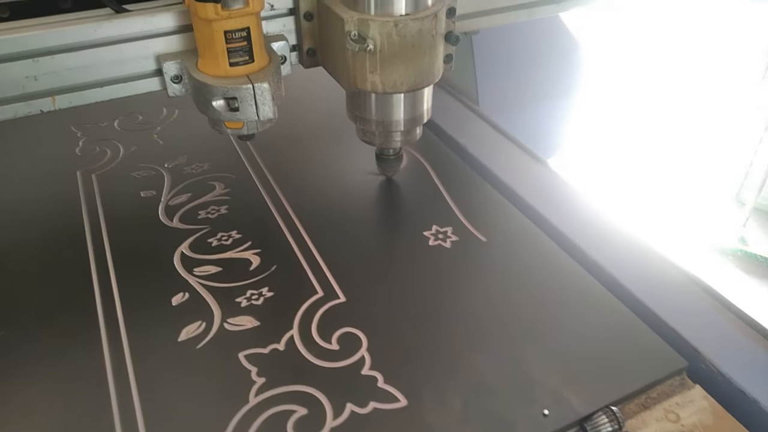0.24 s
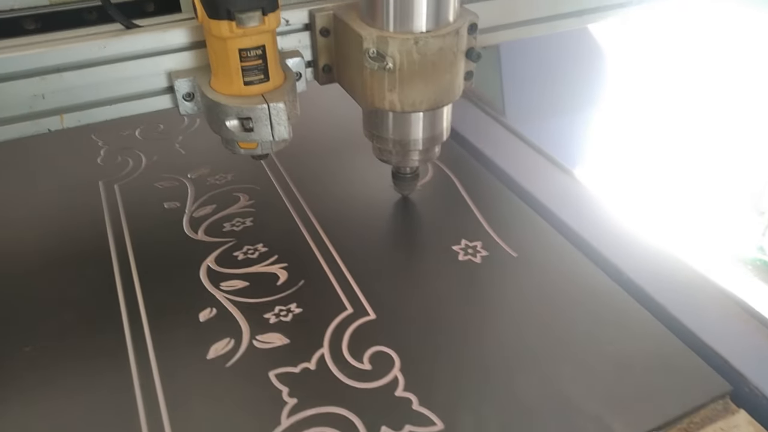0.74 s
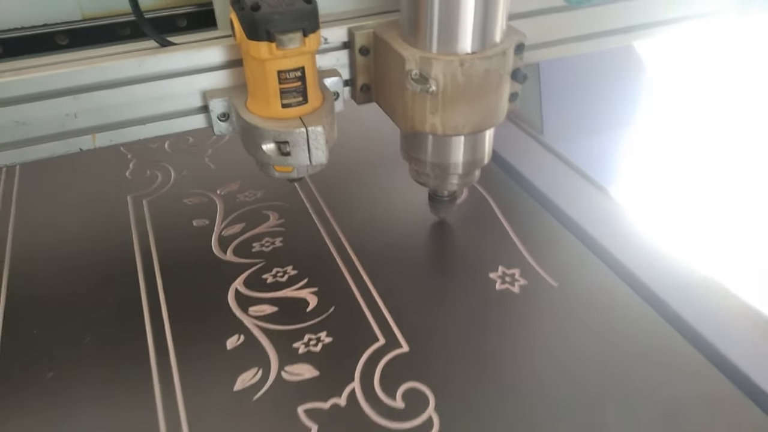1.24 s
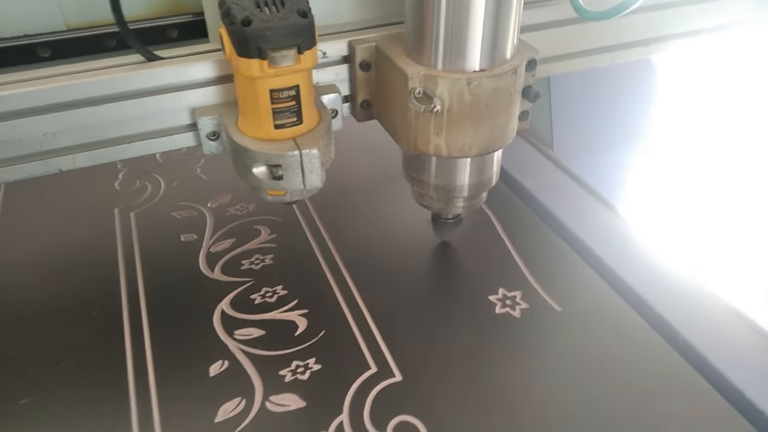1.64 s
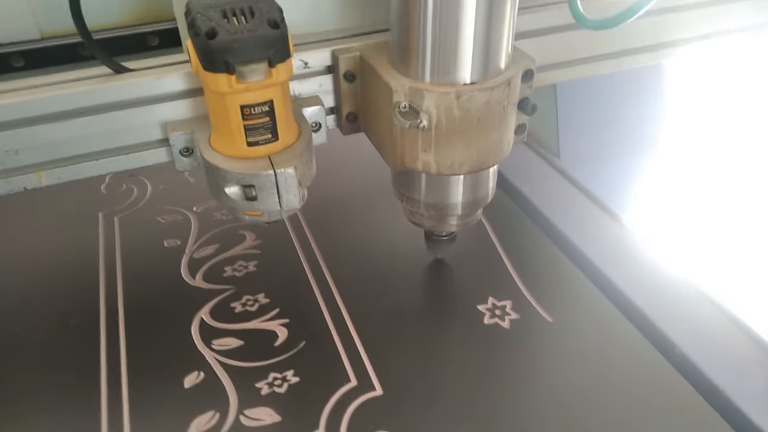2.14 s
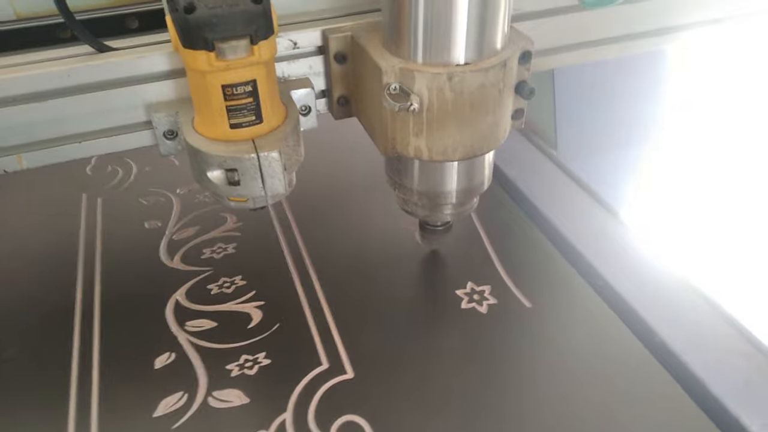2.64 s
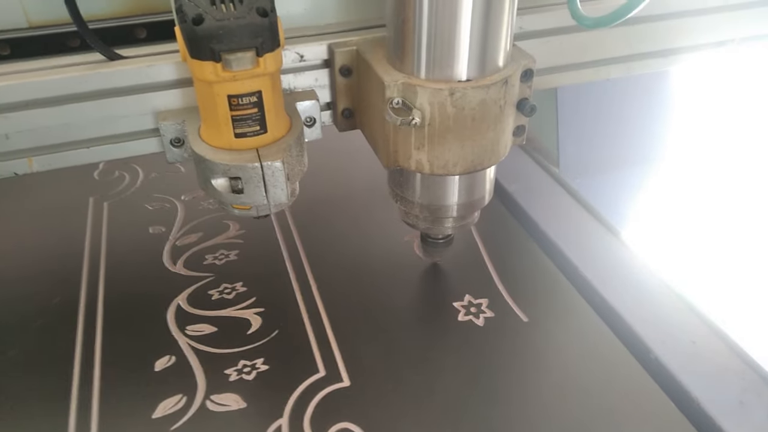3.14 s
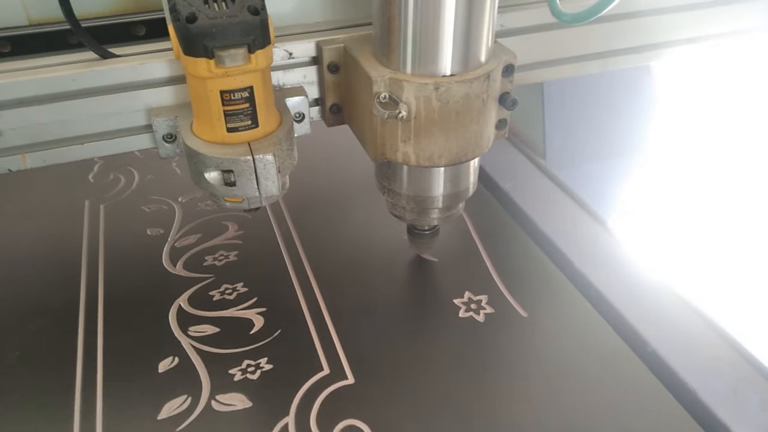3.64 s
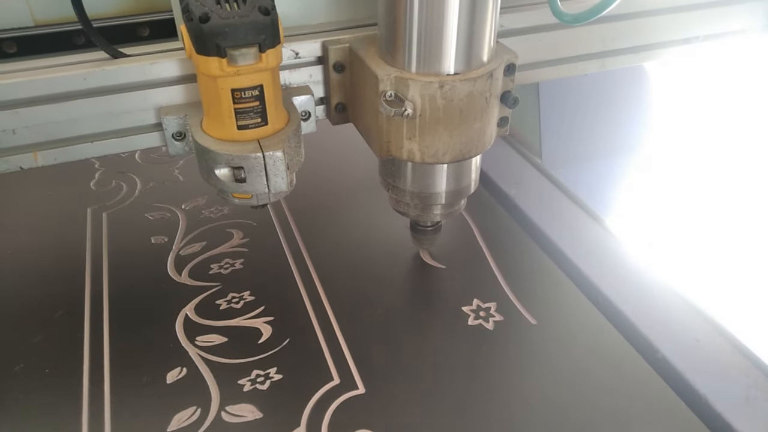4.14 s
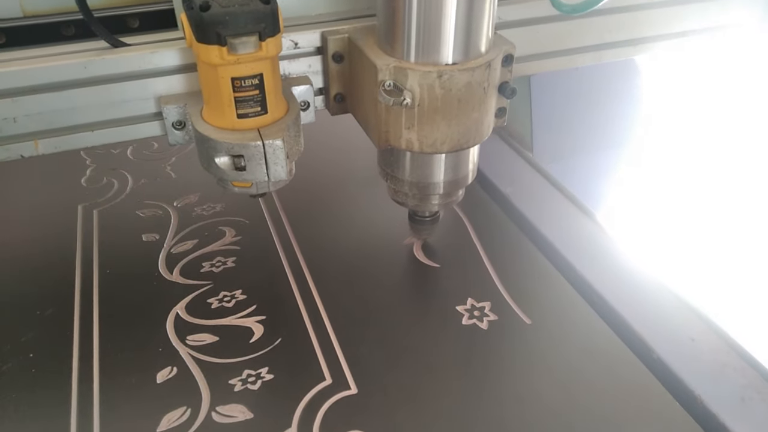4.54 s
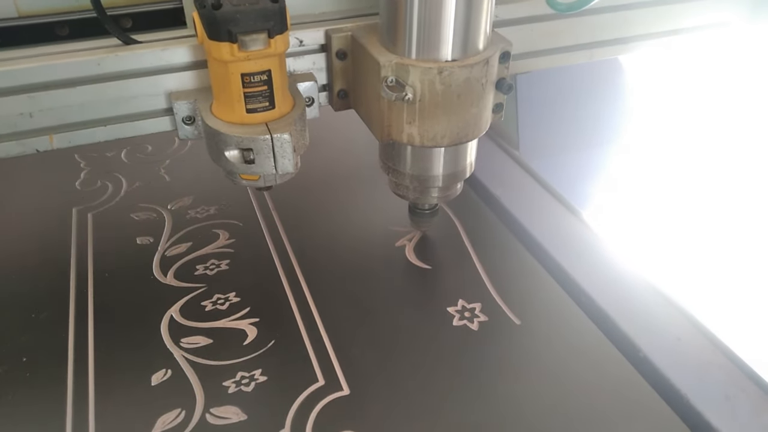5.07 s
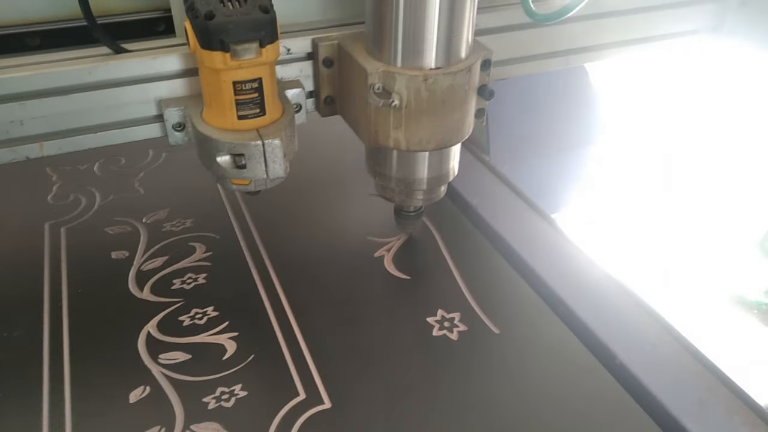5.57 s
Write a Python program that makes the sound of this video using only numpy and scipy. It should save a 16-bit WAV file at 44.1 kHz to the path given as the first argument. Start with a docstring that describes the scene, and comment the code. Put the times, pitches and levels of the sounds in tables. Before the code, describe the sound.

Close, bright drone of a carving router in a workshop, with gritty tearing and dusty hiss rising and easing over faint motor hums.

```python
"""In a workshop, a CNC router carves a wooden panel, heard close up through two microphone ports.
The two-edged bit turns about 400 times a second: steady tones and blurred overtones sit at multiples of that rate.
Noise bursts once a turn are torn fibres and dust; corners add a rough chatter, clean slices a purer buzz.
The cut swells and eases, and thins out while the bit is lifted.
Whistles are narrow wavering bands, steppers gliding tones, gantry and air coloured noise underneath."""
import sys
import numpy as np
from scipy import signal
from scipy.fft import rfft, irfft, next_fast_len
from scipy.io import wavfile

SR = 44100
rng = np.random.default_rng(int(sys.argv[2]) if len(sys.argv) > 2 else 0)


def store_wav(level_fs):
    """Save 16-bit WAV to argv[1]."""
    pcm = np.round(np.clip(np.atleast_2d(level_fs), -1, 1) * 32767)
    wavfile.write(sys.argv[1], SR, pcm.T.astype(np.int16))


N = 256219

# base speed of the spindle, turns per second
SPINDLE_HZ = 399.05
# how the ports face the work, for noise and buzz: f/Hz, left minus right/dB
PORT_FACING = [(300, 3), (2500, 2.5), (4300, 2), (5600, -3.5), (7000, -1), (8300, 6), (10000, 11),
               (14000, 13)]


def undb(db):
    """Decibels to amplitude gain."""
    return 10 ** (np.asarray(db) / 20)


def unit(x):
    """Scale to rms 1."""
    return x / np.sqrt(np.mean(np.abs(x) ** 2))


def curves(table):
    """Each column of a timed table, sample by sample."""
    s, *columns = np.transpose(table)
    return [np.interp(np.arange(N) / SR, s, column) for column in columns]


def over_hz(points):
    """A spectrum table spread over the frequency bins, straight on a log-frequency scale."""
    hz, value = np.transpose(points)
    bins_hz = np.fft.rfftfreq(N, 1 / SR)
    return np.interp(np.log(bins_hz + 1), np.log(hz), value)


def pan(db):
    """Left and right gains, of mean 1, for a left-minus-right level difference."""
    gains = undb(np.array([db, -db]) / 2)
    return gains / gains.mean(axis=0)


def turn(hz):
    """Angle in radians reached at a changing rate."""
    return 2 * np.pi * np.cumsum(hz) / SR


def stretch(start, end, fade_s=0.072):
    """A weight of up to 1 between two times, passing one half at each of them as it fades."""
    t = np.arange(N) / SR
    return np.clip(np.minimum(t - start, end - t) / fade_s + .5, 0, 1)


def flutter(width_hz, limit_hz):
    """Complex random motion of rms 1, strongest below width_hz and falling steeply above limit_hz."""
    step = 32  # samples between the slow random points
    size = next_fast_len(N // step)
    hz = np.fft.fftfreq(size, step / SR)
    shape = 1 / np.sqrt((1 + (hz / width_hz) ** 2) * (1 + (hz / limit_hz) ** 4))
    grain = rng.standard_normal(size) + 1j * rng.standard_normal(size)
    slow = unit(np.fft.ifft(shape * grain))
    return np.interp(np.arange(N) / step, np.arange(size), slow)


def gusts(depth_db):
    """Quick small swells of level, random in decibels."""
    return undb(depth_db * flutter(width_hz=14, limit_hz=35).real)


def noise(spectrum, drive=1):
    """Coloured noise at both ports, partly alike, its strength following drive; the mono sum has rms 1."""
    # likeness of the noise at the two ports: f/Hz, correlation
    port_likeness = [(25, 0.39), (100, 0.98), (800, 0.52), (2000, 0.11), (4500, 0.14), (9000, 0.16)]
    mid, side = rfft(rng.standard_normal((2, N)) * drive)
    alike = over_hz(port_likeness)
    pair = mid * np.sqrt(1 + alike) + np.array([[1], [-1]]) * side * np.sqrt(1 - alike)
    out = irfft(pair * undb(over_hz(spectrum)) * pan(over_hz(PORT_FACING)), N)
    return out / out.mean(axis=0).std()


def tone(angle, db, pan_db, lead, rough):
    """One sine line, randomly shaken by rough; its phase at the left port is lead radians ahead."""
    shake = 1 + rough * flutter(width_hz=6.6, limit_hz=99)
    ports = np.exp(.5j * lead * np.array([[1], [-1]]))
    return np.sqrt(2) * undb(db) * pan(pan_db) * np.imag(ports * shake * np.exp(1j * angle))


def slices():
    """Clean slices make the buzz flare up and change the dust: buzz gained and dust lost, in dB."""
    # clean slices: from t/s, to t/s, fade t/s, buzz gained/dB, dust lost/dB (negative: more dust)
    clean_cuts = [(-.2, 0.228, 0.024, 7.5, 1), (1.407, 1.488, 0.095, 7, 26), (3.501, 3.865, 0.12, 8.5, -1)]
    gained_db, lost_db = 0, 0
    for start, end, fade_s, buzz_db, dust_db in clean_cuts:
        weight = stretch(start, end, fade_s)
        gained_db = gained_db + buzz_db * weight
        lost_db = lost_db + dust_db * weight
    return gained_db, lost_db


def corners():
    """In corners the edges lose their grip: corner weight, bite lost in dB, chatter gain, cut lost in dB."""
    # tight corners: from t/s, to t/s, bite lost/dB, relative chatter level/dB,
    # buzz, rasp and dust lost/dB (negative: gained)
    tight_turns = [(.27, 0.384, 13, -37, -0.5), (1.305, 1.39, 10, -32, 4), (1.757, 1.89, 16, -44, 0.5)]
    weights = np.array([stretch(start, end, fade_s=0.063) for start, end, *_ in tight_turns])
    _, _, bite_db, chatter_db, cut_db = np.transpose(tight_turns)
    return weights.sum(axis=0), bite_db @ weights, undb(chatter_db) @ weights, cut_db @ weights


def whine(angle, tearing, slip_db):
    """The panel radiates the four lowest multiples of the speed as strong tones, steadiest in a clean slice."""
    # once-a-turn push of the off-centre bit: t/s, relative level/dB
    runout = [(0.0, -25), (0.21, -23.5), (0.31, -17.5), (1.36, -21.5), (1.47, -34.5), (1.52, -23.5),
              (1.6, -20.5), (2.81, -22.5), (3.37, -30), (3.69, -25), (4.5, -27.5), (4.69, -23),
              (5.57, -21.5), (5.81, -22)]
    # how hard both cutting edges bite, twice a turn: t/s, relative level/dB
    bite = [(0, -15.5), (.88, -16), (1.25, -21.5), (1.47, -14.5), (1.56, -16), (1.69, -14), (1.98, -22.5),
            (2.18, -35), (2.45, -23), (2.85, -15), (3.03, -19), (3.2, -28), (3.72, -28), (4.07, -21.5),
            (4.47, -22.5), (4.8, -14), (5.5, -14), (5.81, -19.5)]
    # the panel's answer at three times the speed: t/s, relative level/dB
    third_answer = [(0.0, -20.5), (0.18, -23.5), (0.37, -35), (1.28, -29.5), (1.33, -36), (1.76, -25),
                    (1.89, -48), (2.26, -32), (2.85, -26), (3.4, -59), (3.43, -42), (3.83, -26),
                    (4.14, -43.5), (4.55, -27.5), (4.63, -39), (4.74, -27), (5.73, -37), (5.81, -30)]
    # and at four times the speed: t/s, relative level/dB
    fourth_answer = [(0.0, -39.5), (0.76, -28.5), (1.62, -40), (1.78, -27), (1.83, -41), (2.22, -41),
                     (2.8, -31), (3.23, -50), (3.72, -28), (3.82, -40), (3.98, -32), (5.28, -30),
                     (5.5, -39.5), (5.81, -31.5)]
    # standing waves shift as the gantry travels: t/s, first tone left minus right/dB,
    # its lead at the left port/rad, second tone left minus right/dB
    standing_waves = [(0, 1.5, -0.74, -3), (1.2, 4, -0.97, 0.5), (1.7, 1.5, -0.5, 0.5), (2.2, .5, -.7, 8),
                      (2.85, -2.5, -.2, 4), (3.35, 0, 1.54, 3), (3.75, 1.5, 0.62, 3.5),
                      (4.25, 8.5, 0.58, 9.5), (4.7, 4, -0.13, 6), (5.35, 0, -0.23, 1), (5.81, -3, -0.99, 5)]
    first_pan, first_lead, second_pan = curves(standing_waves)
    third_pan = 2.4 + 6.8 * flutter(width_hz=2.0, limit_hz=7).real
    first, second, third, fourth = (k * angle + rng.uniform(0, 2 * np.pi) for k in range(1, 5))
    # the added decibels trim each tone as a whole
    out = tone(first, curves(runout)[0] + 0.9, first_pan, first_lead, rough=0.078 * tearing)
    out += tone(second, curves(bite)[0] - slip_db + 0.32, second_pan, 0.34, rough=0.078 * tearing)
    out += tone(third, curves(third_answer)[0] + 1.54, third_pan, -0.87, rough=0.32 * tearing)
    out += tone(fourth, curves(fourth_answer)[0] + 0.6, np.array([-1.5]), 0.34, rough=0.4 * tearing)
    return out


def singing_db(hz, width_hz=170):
    """How much the panel resonances under the bit lift an overtone, in dB."""
    # resonances that sing while the bit passes over them: from t/s, to t/s, f/Hz, lift at centre/dB
    resonances = [(-.2, 0.28, 3590, 13.5), (.3, 0.75, 3590, 10), (.25, 1.45, 5190, 5.5),
                  (.55, 2.2, 3990, 7.5), (.4, 1.39, 3190, 4), (1.42, 1.8, 1995, 6), (1.75, 2.35, 3190, 7),
                  (1.9, 3.1, 2395, 7), (3.35, 3.67, 2395, 11.5), (3.48, 4.1, 3190, 7),
                  (3.74, 3.95, 1995, 7), (4.0, 6, 3590, 7), (4.7, 6.2, 2790, 4)]
    out = np.zeros(N)
    for start, end, centre, db in resonances:
        if abs(hz - centre) < 2 * width_hz:
            out += db * stretch(start, end) * np.exp(-((hz - centre) / width_hz) ** 2)
    return out


def buzz(angle, buzz_db, tearing, rough=0.084, wander=0.26, spread=0.93, blur_hz=18, reach_hz=95, lead=1.0):
    """No two bites are alike, so high overtones blur, the more as wood tears; they share out the buzz power."""
    # overtones of the buzz: multiple of the speed, relative level/dB
    overtones = [(5, 3), (6, -1.5), (7, 2.5), (8, 2.5), (9, -2), (10, 0), (11, 1), (12, 1.5), (13, 0),
                 (14, -2), (15, -1), (16, -0.5), (17, -3.5), (18, -8.5), (19, -10), (20, -7.5)]
    out, power = np.zeros((2, N)), 0
    side = np.array([[1], [-1]])
    for k, db in overtones:
        sung_db = singing_db(k * SPINDLE_HZ)
        gain = undb(db + sung_db)
        # a singing resonance evens out its overtone: half a dB of blur lost per dB gained
        blur = rough * k * tearing * undb(-0.5 * sung_db)
        carrier = np.exp(1j * (k * angle + rng.uniform(0, 2 * np.pi))) / np.sqrt(1 + blur ** 2)
        common = 1 + wander * tearing * flutter(width_hz=9.0, limit_hz=24) + blur * flutter(blur_hz, reach_hz)
        # reflections from the machine bed add at one port and subtract at the other
        reflected = spread * (.5 * flutter(width_hz=0.54, limit_hz=0.9) + blur * flutter(blur_hz, reach_hz))
        # neighbouring overtones lead in phase at opposite ports
        facing_db = np.interp([k * SPINDLE_HZ], *np.transpose(PORT_FACING))
        ports = pan(facing_db) * np.exp(.5j * lead * side * (-1) ** k)
        out += gain * np.imag(ports * (common + side * reflected) * carrier)
        power = power + gain ** 2
    return out / np.sqrt(power) * undb(buzz_db + 5.5)


def repeated(x):
    """A copy one turn late is mixed in, thinning the noise between the overtones."""
    hz = np.fft.rfftfreq(N, 1 / SR)
    share = 0.39 / (1 + (hz / 4560) ** 4)  # the copy's share fades above 4560 Hz
    one_turn_late = np.exp(-2j * np.pi * hz / SPINDLE_HZ)
    return irfft(rfft(x) * (1 + share * one_turn_late) / np.sqrt(1 + share ** 2), N)


def chips(angle, rasp_db, dust_db, rasp_depth=0.29, dust_depth=0.052, sharp=0.97):
    """Fibres tear in a burst on each turn; the dust thrown off hisses more evenly."""
    # spectrum of tearing fibres: f/Hz, relative level/dB
    rasp_spectrum = [(250, -16), (400, -39), (560, -5), (1000, -10.5), (1800, -12), (2700, -3.5),
                     (3400, -9), (4150, -5.5), (4600, -2), (6200, 0.5), (7800, -8), (9500, -5.5),
                     (14000, -19)]
    # spectrum of flying dust: f/Hz, relative level/dB
    dust_spectrum = [(3000, -29), (4200, -38), (6500, 3.5), (7900, 6), (8550, 0.5), (9100, 0.5),
                     (10200, -1), (10700, -3), (11800, -5.5), (14200, -7.5)]
    burst = unit(np.exp(sharp * np.cos(angle)))
    burst = burst * undb(5.4 * flutter(width_hz=61, limit_hz=400).real)  # uneven strength
    rasp = noise(rasp_spectrum, 1 - rasp_depth + rasp_depth * burst)
    rasp = repeated(rasp) * gusts(depth_db=1.87)
    dust = noise(dust_spectrum, 1 - dust_depth + dust_depth * burst) * gusts(depth_db=2.0)
    return rasp * undb(rasp_db - 4.0) * pan(np.array([-.4])) + dust * undb(dust_db - 0.96)


def chatter(angle):
    """Uneven bites smear the three lowest multiples of the speed into a rough flutter."""
    out = 0
    for k, db in enumerate((-3, 0, -4), 1):
        smeared = flutter(width_hz=27, limit_hz=75) * np.exp(1j * k * angle)
        out = out + undb(db) * np.imag(smeared)
    return out


def whistles():
    """Thin, breathy whistles of the spinning bit and collet: sines spread by random motion."""
    # whistles: from t/s, to t/s, f/Hz, width f/Hz, relative level/dB
    whistle_bands = [(-.3, 1.5, 8900, 130, -39), (-.3, 1.0, 10840, 100, -46), (1.8, 6.1, 10180, 120, -52),
                     (4.0, 5, 10100, 140, -49)]
    out = 0
    for start, end, hz, width_hz, db in whistle_bands:
        carrier = np.exp(1j * turn(np.full(N, hz)))
        band = np.imag(flutter(width_hz / 2, 2 * width_hz) * carrier)
        out = out + undb(db) * band * stretch(start, end, fade_s=0.2)
    return out * pan(np.array([11.0]))


def machine():
    """The gantry rumbles, air rushes round the collet and steppers set the frame humming at their step rates."""
    # gantry rumble: f/Hz, relative level/dB
    gantry_spectrum = [(25, -24), (45, -21), (62, -11), (92, -23), (116, 1), (140, -8), (165, 1), (183, -5),
                       (205, -2), (240, -3), (400, -2), (600, -10), (3000, -7.5), (9000, -33)]
    # rush of air: f/Hz, relative level/dB
    air_spectrum = [(600, -7), (1500, 3), (2800, 9), (4000, -11), (7000, 0), (14000, -16)]
    # stepper moves: from t/s, to t/s, first step rate f/Hz, last step rate f/Hz, level/dB
    stepper_moves = [(.68, .92, 118, 117, -51), (1.315, 1.555, 113.6, 115, -48),
                     (1.934, 2.03, 192, 195, -42.5), (2.28, 2.56, 345, 341, -48),
                     (2.805, 2.917, 281, 279.4, -45), (3.02, 3.13, 112.2, 113, -58),
                     (3.154, 3.628, 214, 218.3, -45.5), (3.602, 3.803, 226, 292, -46),
                     (4.0, 4.417, 341, 339, -47.5), (4.422, 4.899, 327, 245, -49),
                     (4.681, 4.985, 114.3, 114.6, -47.5), (5.221, 5.483, 213, 198, -41.5),
                     (5.618, 5.9, 200.7, 204, -45)]
    out = noise(gantry_spectrum) * undb(-41) * gusts(depth_db=3.0)
    out += noise(air_spectrum) * undb(-47)
    for start, end, first_hz, last_hz, db in stepper_moves:
        step_hz = curves([(start, first_hz), (end, last_hz)])[0]
        hum = tone(turn(step_hz), db, np.array([2.0]), lead=.1, rough=0.56)
        out += hum * stretch(start, end)
    return out


def scene():
    """One spindle angle drives whine, buzz, chatter and chip bursts; slices, corners and the lift set levels."""
    # slow drift of the cut along the groove: t/s, buzz of the edges, relative level/dB,
    # rasp of tearing fibres, relative level/dB, hiss of flying dust, relative level/dB
    cut_drift = [(0, -28.5, -34, -33), (.33, -28, -26, -40), (.55, -28, -25.5, -32.5),
                 (1.25, -32, -24.5, -32), (2.15, -28.5, -25, -31.5), (2.85, -32.5, -27, -30),
                 (4.05, -34.5, -29, -30.5), (4.75, -31, -27.5, -27.5), (5.81, -32, -28.5, -30.5)]
    # the bit lifts clear of the wood between two grooves
    lifted = stretch(3.08, 3.53, fade_s=0.36)
    cornering, slip_db, shudder, cut_lost_db = corners()
    flare_db, dust_lost_db = slices()
    # the spindle runs a little faster when free or slicing cleanly, slower in a corner (Hz)
    speed_hz = SPINDLE_HZ + 0.702 * lifted + 0.05 * flare_db - 2.4 * cornering
    angle = turn(speed_hz)
    buzz_db, rasp_db, dust_db = np.array(curves(cut_drift)) - cut_lost_db
    # decibels lost while lifted: buzz 13, rasp 6.5, dust 9.5
    buzz_db = buzz_db + flare_db - 13 * lifted
    rasp_db = rasp_db - 6.5 * lifted
    dust_db = dust_db - dust_lost_db - 9.5 * lifted
    # a clean slice sings purely; where the rasp takes over, the bites grow uneven
    tearing = undb(0.52 * np.minimum(rasp_db - buzz_db, 1))
    cut = buzz(angle, buzz_db, tearing) + chips(angle, rasp_db, dust_db)
    # some chatter always follows the rasp; corners add more
    cut += chatter(angle) * (shudder + undb(rasp_db - 13))
    return whine(angle, tearing, slip_db) + cut + whistles() + machine()


def record(dry):
    """The recorder cuts the top steeply above 14250 Hz with an elliptic low-pass."""
    low_pass = signal.ellip(12, .2, 80, 14250, fs=SR, output="sos")
    return signal.sosfilt(low_pass, dry)


dry = scene()
out = record(dry)
store_wav(out)
```